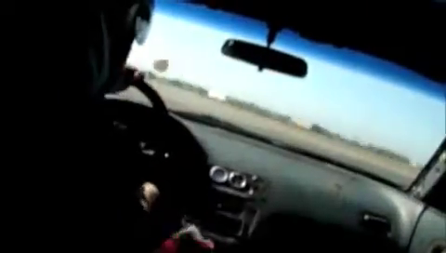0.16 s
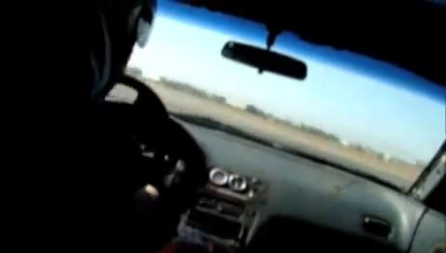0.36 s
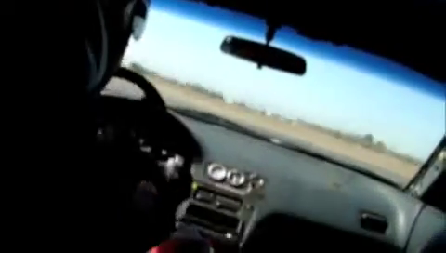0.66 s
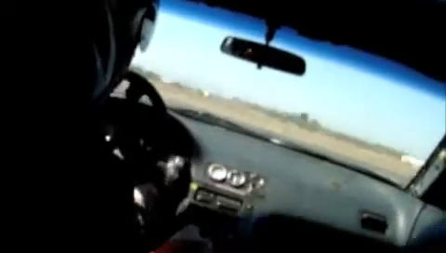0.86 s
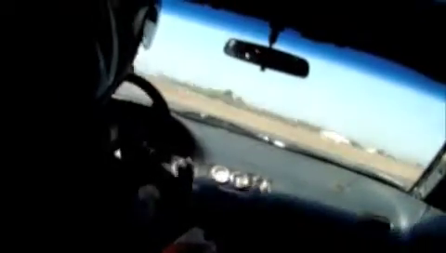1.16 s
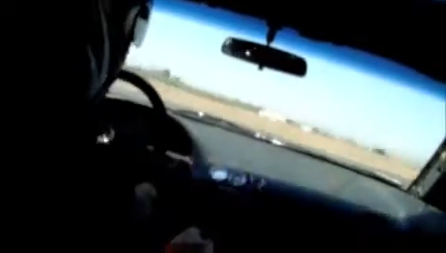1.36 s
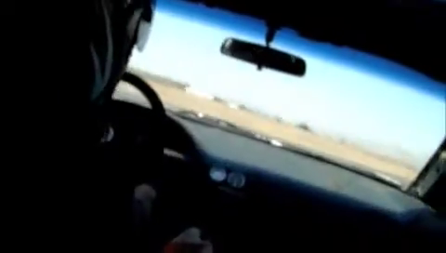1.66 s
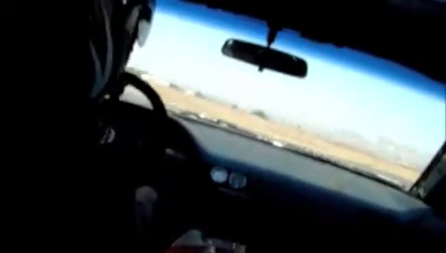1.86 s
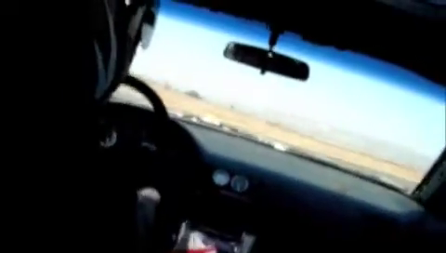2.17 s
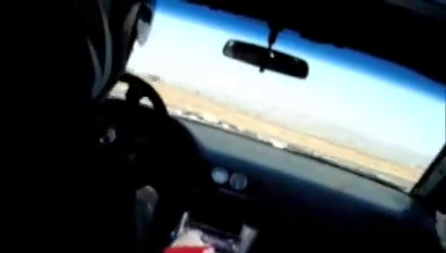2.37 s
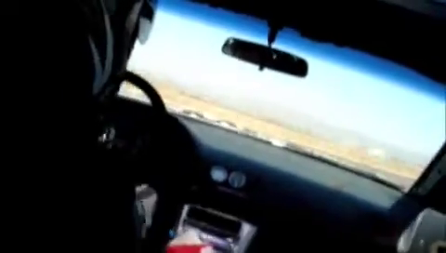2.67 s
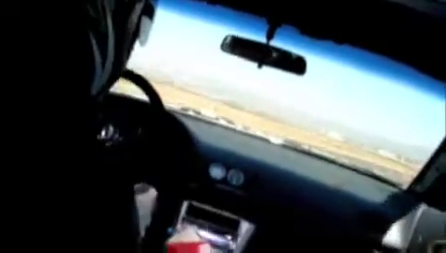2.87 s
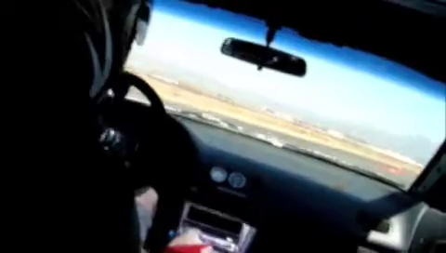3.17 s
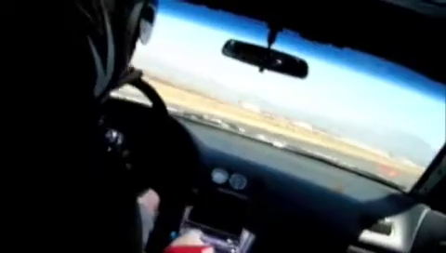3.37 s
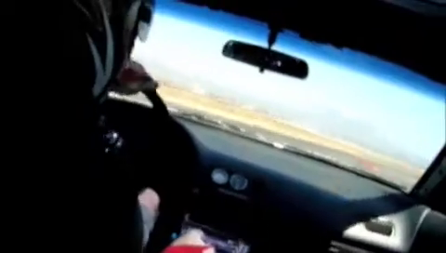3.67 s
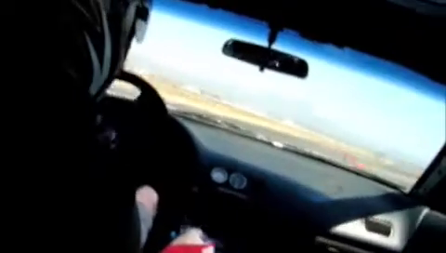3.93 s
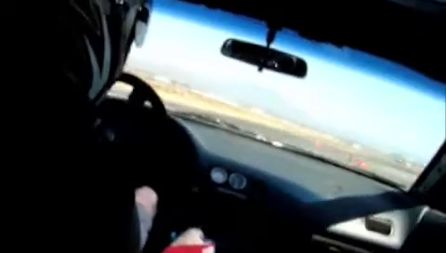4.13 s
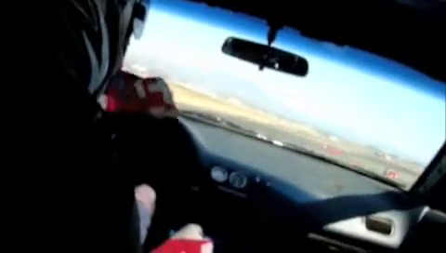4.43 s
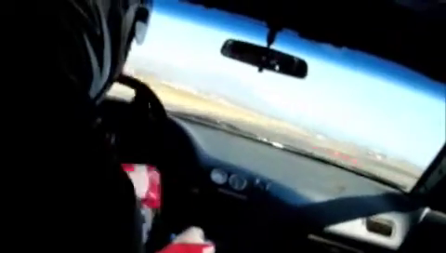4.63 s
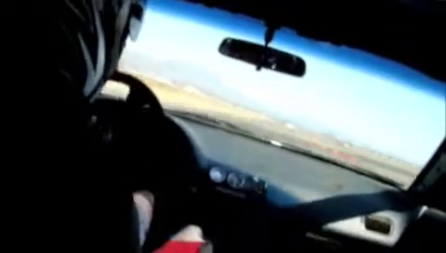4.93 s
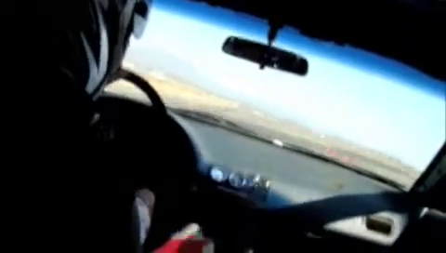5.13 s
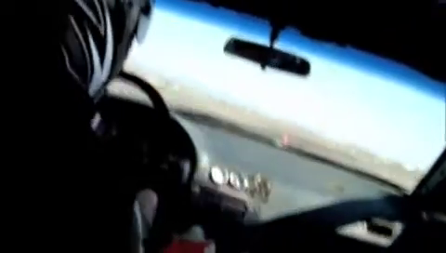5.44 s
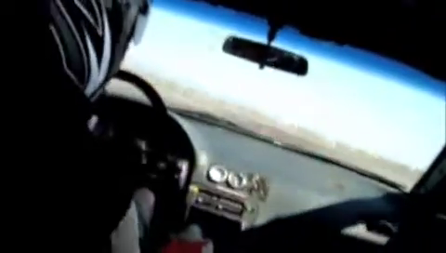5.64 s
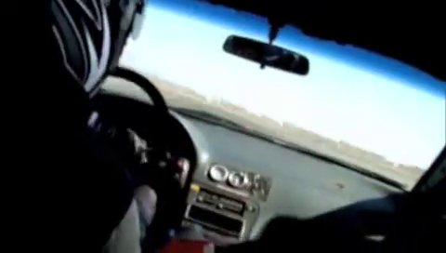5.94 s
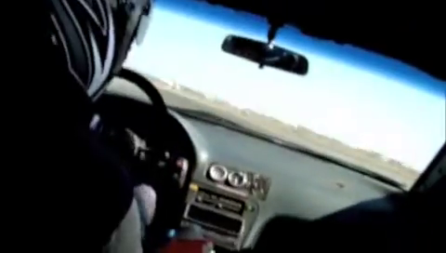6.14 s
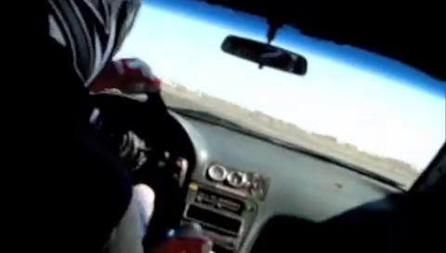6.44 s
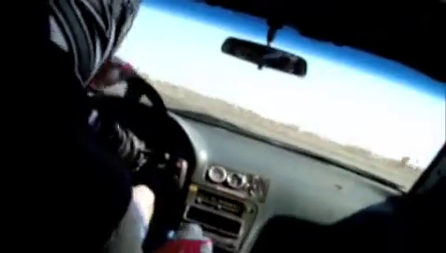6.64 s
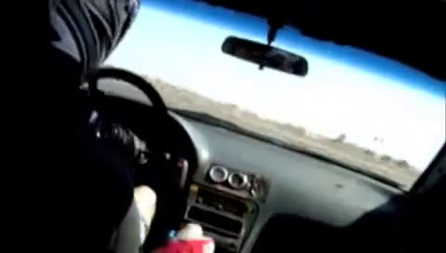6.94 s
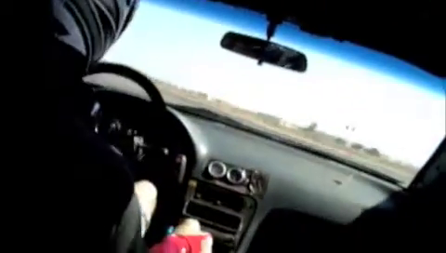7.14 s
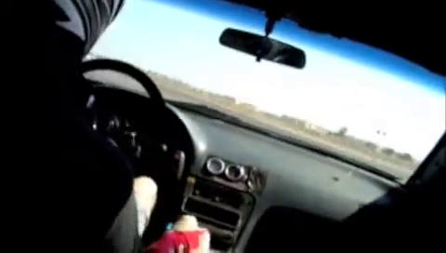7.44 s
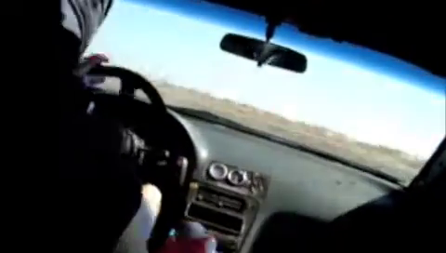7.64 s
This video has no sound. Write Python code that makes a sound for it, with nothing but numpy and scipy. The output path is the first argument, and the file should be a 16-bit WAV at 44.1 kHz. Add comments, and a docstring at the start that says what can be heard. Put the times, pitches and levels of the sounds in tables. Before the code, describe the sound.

Inside a car cabin, a drift is already under way. Two tyres squeal at once, around 1150 and 1330 Hz, rough and wavering, throbbing about ten times a second, with a slow sway between them at first. Gritty rubber scrub hisses around them over low body roar and a buzzing four-cylinder drone. Dull knocks land near 0.9-1 s. Brief harder bites make the squeal clearer and the scrub surge, including a longer one near 3.75 s. Engine pitch creeps upward, with throttle dips. Around 5 s loose parts clatter and a narrow moan swells; roar rises at 5.4 s, with more rattles until 5.9 s. Revs peak near 6.1 s, dip, then another moan and clatter come at 6.5-6.65 s. After revs peak again at 7.1 s, the engine drops sharply and the lower tyre clears into a steadier whistle. Squeal collapses by 7.7 s amid small rattles; a broad roaring surge ends it.

```python
"""Two tyres squeal at once, throbbing with each wheel turn, over engine drone: a long drift heard in the cabin.
Squeal: stick-slip tones with unsteady pitch. Scrub, low roar, rattles, knocks, moans: shaped noise.
Engine: summed harmonics of a four-cylinder four-stroke cycle, geared to the wheel.
Near the end the throttle shuts, the lower tyre clears to a whistle, and a broad surge comes as it returns."""
import sys
import numpy as np
from scipy import signal
from scipy.fft import rfft, irfft
from scipy.io import wavfile

SR = 44100
rng = np.random.default_rng(int(sys.argv[2]) if len(sys.argv) > 2 else 0)


def put_to_file(sound):
    """Save the sound as 16-bit audio at rate SR, in the file named by the first command-line argument."""
    columns = np.atleast_2d(sound).T  # one column per channel
    safe = np.clip(columns, -1, 1)
    whole_steps = np.round(safe * 32767)
    wavfile.write(sys.argv[1], SR, whole_steps.astype(np.int16))


N = 343960
TIME_S = np.arange(N) / SR
BINS_HZ = np.fft.rfftfreq(N, 1 / SR)

# Half lengths and half widths are to 1/e of a Gaussian swell. Source levels are ahead of the cabin.
# Low roar through the body: [f/Hz, relative density/dB]
ROAR_COLOUR = [(20, -28), (45, -29), (75, -16), (110, -7), (230, -6), (300, 2), (450, -1.5), (650, 4.5),
               (850, 4), (1300, 1.5), (2500, -13.5), (8000, -22)]
ROAR_DB = -32.5
# Swells of the low roar, the last a broad surge as the throttle returns: [t/s, half length/s, change/dB]
ROAR_SWELLS = [(.38, 0.28, 2.5), (1.02, 0.15, 2.5), (5.42, 0.33, 6.5), (6.5, .25, 4.5), (7.52, 0.094, 2.5),
               (7.76, .06, 9.5)]
# Knocks through the body: [t/s, peak of noise envelope/dB, centre f/Hz]
KNOCKS = [(.85, -40, 125), (.877, -26.5, 410), (0.977, -28, 407), (5.33, -48, 110), (7.125, -42, 105)]
# Loose bits rattling: [t/s, nominal peak/dB, length/s]
RATTLES = [(4.964, -20, 0.017), (4.995, -17, 0.013), (5.049, -24, 0.037), (5.484, -19, 0.039),
           (5.536, -26, 0.035), (5.843, -21.5, 0.024), (5.86, -22, 0.024), (5.913, -21, 0.026),
           (6.602, -18, 0.03), (6.654, -16.5, 0.017), (7.622, -30.5, 0.022), (7.645, -39, 0.022),
           (7.662, -26.5, 0.029), (7.723, -24.5, 0.029)]
# Rattle spectrum: [f/Hz, relative density/dB]
RATTLE_COLOUR = [(1000, -22), (3000, 0), (4500, 1), (6500, 0.5), (8000, -0.5), (10000, -2.5)]
RATTLE_TAIL_DB, RATTLE_TAIL_S = -14, 0.033  # tail against the main clatter, decay constant
# Engine resonance swells, two narrow moans near 750 Hz, then a broad throttle-return surge:
# [t/s, peak level/dB, centre f/Hz, bandwidth/Hz, half length/s]
ENGINE_SWELLS = [(5.026, -26, 760, 10, 0.22), (6.47, -27, 746, 26, 0.11), (7.79, -26, 637.4, 325, 0.041)]
# Cabin resonances, for all but engine and its swells: [f/Hz, width/Hz, gain of each alone/dB]
CABIN_MODES = [(567, 14, -3), (1024, 26, 7.5), (1076.5, 13.3, 5), (1075, 8.6, 4), (1194, 19, 4),
               (1276, 7.8, 5), (1380, 8.6, 8), (1549, 22, 6.5), (1666, 20, 2.5), (1960, 23, 7.5),
               (2100, 39, 6.5), (2203, 13, 7), (2268, 21, 8), (2390, 34, 6.5), (2518, 40, 3.5),
               (2510, 26, 0.5), (2723, 13, 7), (3250, 37, 3.5), (3330, 30, 1.5), (3980, 14, 7.5),
               (4100, 27, 0.5)]

# Engine speed: [t/s, firing rate/Hz]
FIRING_RATE = [(0, 140), (.35, 147), (.8, 145.1), (1.0, 148.8), (1.42, 154), (2.0, 148.4), (2.25, 152.2),
               (2.55, 150.1), (3.0, 153.8), (3.2, 161.9), (3.4, 158.7), (4.15, 164.9), (4.65, 156.7),
               (4.9, 160.1), (5.15, 160.9), (5.6, 171), (6.08, 177.1), (6.36, 162.2), (6.5, 166.4),
               (7.1, 179.1), (7.3, 139.2), (7.45, 124.4), (7.65, 124.1), (7.8, 139.2)]
# Throttle eased (-) or pressed (+): [t/s, half length/s, change/dB]
THROTTLE = [(0, 0.062, -9), (.75, .1, -5), (1.5, 0.14, -9), (2.95, .15, -1), (4.35, 0.14, -7.5),
            (4.85, 0.38, 6), (5.55, 0.41, 2), (6.23, .11, -12), (6.7, 0.074, -7), (7.23, 0.13, -18)]
# Exhaust booms: [multiple of firing rate, level far from resonance/dB, resonance/Hz, half width/Hz,
# swell/dB, share of throttle change]
BOOMS = [(1, -43, 171, 14.3, 12, 0.96), (2, -50.5, 342, 35, 20, 0.45), (3, -53, 455, 16, 12, .3)]
# Rasp from unequal cylinders: [multiple of four-stroke cycle rate, relative level/dB]
RASP_ORDERS = [(5, -22), (6, -23.5), (7, -14), (9, -14.5), (10, -21), (11, -18), (13, -16), (14, -19),
               (15, -12.5), (16, -4), (17, -11), (18, -12.5), (19, -11), (20, -8), (21, -10.5), (22, -12),
               (23, -23), (24, -7.5)]
# Rasp hardening with revs: [firing rate/Hz, gain/dB]
RASP_BY_RATE = [(126, -57), (140, -41.5), (150, -37.5), (160, -34), (178, -33.5)]
RASP_THROTTLE_SHARE = .15
# Body panels booming as a rasp order crosses them: [f/Hz, width/Hz, gain of each alone/dB]
PANEL_MODES = [(561.5, 4.16, 21), (760, 38, 10.5)]

# Rubber tearing over grit: [t/s, level before swells/dB]
SCRUB_LEVEL = [(0, -21), (.17, -26.5), (.3, -23.5), (.95, -20.5), (1.35, -22.5), (2.2, -20.5), (3.9, -21.5),
               (5.1, -23), (5.45, -24), (5.7, -23), (6.35, -23.5), (7.2, -22.5), (7.67, -35), (7.8, -24.5)]
# Scrub spectrum: [f/Hz, relative density/dB]
SCRUB_COLOUR = [(400, -41), (800, -15.5), (1100, -5.5), (1500, 2), (1780, 5), (2000, -3.5), (2400, -2.5),
                (2850, -2.5), (3100, -4.5), (4000, -7), (5000, -11.5), (6000, -16.5), (8000, -19.5),
                (10000, -24.5)]
# Slow change in scrub colour, roar and fizz grow until 5.5 s, then ease: [t/s, lift against the middle/dB]
SCRUB_BODY = [(0, -1.5), (1, -2), (3, -1.5), (3.8, 0), (5, 1.5), (5.5, 3), (7.1, 1.5), (7.5, 0), (7.8, 0.5)]
FIRINGS_PER_WHEEL_TURN = 15.55
# Grippy tread patches: [place/turns, strength, half length/turns]
PATCHES = [(.025, 3.82, 0.078), (.39, 2.27, .14), (.66, .7, .06)]
# Tyres biting harder, squeal clears and scrub surges: [t/s, half length/s, relative strength]
BITES = [(.6, 0.039, .7), (.8, 0.059, 1), (1.52, 0.038, 1.07), (1.82, 0.051, 0.55), (2.52, 0.063, 0.81),
         (2.85, 0.054, .4), (3.75, 0.212, 0.67), (4.3, 0.039, 0.81), (4.99, 0.061, 0.78),
         (6.61, 0.028, 0.49), (7.26, .07, 0.55)]
BITE_SCRUB_DB = 3  # per unit strength
# Slide: [t/s, higher tyre pitch before bends/Hz, higher tyre level/dB, lower tyre level/dB], levels before rock
SLIDE = [(0, 1350, -21.5, -18), (.15, 1320, -19, -20.5), (1.0, 1320, -18, -23), (1.9, 1310, -19.5, -21.5),
         (2.9, 1320, -18.5, -25.5), (3.9, 1370, -19.5, -30.5), (4.65, 1365, -17.5, -27.5),
         (5.08, 1390, -21, -34), (5.3, 1350, -21.5, -26), (5.5, 1340, -26.5, -34), (5.7, 1330, -23.5, -23),
         (6.35, 1299, -19.5, -24.5), (6.56, 1310, -23.5, -21.5), (6.68, 1375, -20.5, -28),
         (7.1, 1325, -21.5, -21), (7.25, 1334, -20, -18.5), (7.57, 1277, -27, -20), (7.68, 1300, -41, -56),
         (7.8, 1340, -38, -60)]
LOW_PITCH_RATIO = .865  # lower tyre / higher tyre
# Body rocks on entering the drift, passing load from tyre to tyre; bend is a share of pitch
ROCK_HZ, ROCK_PEAK_S, ROCK_SETTLE_S, ROCK_DB, ROCK_BEND = 2.8, 0.0494, 1.2, 3.5, 0.0249
# Pitch roughness (scales the bends): base, then change per unit bite and at full whistle
SLIDE_ROUGH, BITE_ROUGH, WHISTLE_ROUGH = .8, -0.2403, -0.459
# Octave against fundamental: base, then the same changes
SLIDE_OCTAVE_DB, BITE_OCTAVE_DB, WHISTLE_OCTAVE_DB = -11, 4.5, 7
# Lower tyre clears to a whistle as wheelspin dies; its octave lift then fades
WHISTLE_START_S, WHISTLE_RISE_S, WHISTLE_OCTAVE_FADE_S = 7.15, .09, .3
WHISTLE_STEADYING = .5  # share of the wheel's throb removed at full whistle, both tyres
TREAD_CUTOFF_HZ = 960
EDGE_HZ = 10150  # final band limit


def amp(db):
    """Decibels to gain."""
    return 10 ** (np.asarray(db) / 20)


def unit(x):
    """Scale to rms 1."""
    return x / np.sqrt(np.mean(x ** 2) + 1e-20)


def follow(rows):
    """Interpolate each column of a time table at every sample."""
    t_s, *columns = np.transpose(rows)
    return [np.interp(TIME_S, t_s, column) for column in columns]


def swells(rows):
    """Sum of Gaussian swells: time, half length, height."""
    return sum(height * np.exp(-((TIME_S - t_s) / half_s) ** 2) for t_s, half_s, height in rows)


def coloured(points):
    """Noise of rms 1, spectrum interpolated over log frequency."""
    hz, db = np.transpose(points)
    gain = amp(np.interp(np.log(BINS_HZ + 1), np.log(hz), db))
    return unit(irfft(rfft(rng.standard_normal(N)) * gain, N))


def wander(rate_hz):
    """Low-passed random drift of rms 1, mostly below the given rate."""
    return unit(irfft(rfft(rng.standard_normal(N)) / (1 + (BINS_HZ / rate_hz) ** 4), N))


def ring(x, modes):
    """Product of resonances, each raising or lowering a narrow band."""
    response = np.prod([1 + (amp(db) - 1) / (1 + 2j * (BINS_HZ - hz) / width_hz)
                        for hz, width_hz, db in modes], axis=0)
    return irfft(rfft(x) * response, N)


def reflections(x, t60_s, size=4096):
    """Dense early echoes off glass and dashboard, dying fast."""
    t_s = np.arange(size) / SR
    spectrum = rfft(rng.standard_normal(size) * amp(-60 * t_s / t60_s), 2 * size)
    # phase only: smears time, leaves colour nearly even
    echoes = irfft(spectrum / abs(spectrum))[:size]
    return signal.fftconvolve(x, echoes)[:N]


def low_roar():
    """Low roar through the body: coloured noise with a random lumpy level."""
    level_db = ROAR_DB + swells(ROAR_SWELLS) + 2.1 * wander(rate_hz=28)
    return amp(level_db) * coloured(ROAR_COLOUR)


def knocks():
    """Dull, heavily damped blows through the suspension: noise bands under short pulses."""
    out = np.zeros(N)
    for t_s, db, hz in KNOCKS:
        age = np.maximum(TIME_S - t_s, 0) / 0.011  # in rise times
        band = coloured([(hz / 2, -14), (hz, 0), (hz * 2, -14), (hz * 10, -60)])
        out += amp(db) * age * np.exp(1 - age) * band
    return out


def rattles():
    """Dense clatter of loose bits: bright flickering noise in short bursts with faint tails."""
    shake = np.zeros(N)
    for t_s, db, length_s in RATTLES:
        age_s = np.maximum(TIME_S - t_s, 0)
        rise = 1 - np.exp(-age_s / 0.0024)
        fall = np.exp(-(age_s / length_s) ** 3) + amp(RATTLE_TAIL_DB) * np.exp(-age_s / RATTLE_TAIL_S)
        shake += amp(db - 3.5) * rise * fall
    return shake * unit(coloured(RATTLE_COLOUR) * amp(1.2 * wander(rate_hz=1000)))


def engine_swells():
    """Noise bands for engine resonance: two narrow moans, then a broad throttle-return surge."""
    out = np.zeros(N)
    for t_s, db, hz, width_hz, half_s in ENGINE_SWELLS:
        gain = 1 / (1 + (2 * (BINS_HZ - hz) / width_hz) ** 2)
        band = unit(irfft(rfft(rng.standard_normal(N)) * gain, N))
        out += amp(db) * np.exp(-((TIME_S - t_s) / half_s) ** 2) * band
    return out


def engine(firing_hz):
    """Exhaust booms on firing harmonics plus cycle-order rasp; uneven combustion shakes the rasp most."""
    firing_angle = 2 * np.pi * np.cumsum(firing_hz * (1 + 0.0015 * wander(rate_hz=11.0))) / SR
    throttle_db = swells(THROTTLE)
    boom = np.zeros(N)
    for multiple, far_db, hz, half_hz, swell_db, share in BOOMS:
        k = round(multiple)
        nearness = np.exp(-((k * firing_hz - hz) / half_hz) ** 2)
        db = far_db + swell_db * nearness + share * throttle_db
        boom += amp(db + 1.3 * wander(rate_hz=39)) * np.cos(k * firing_angle + k - 1)
    cycle_angle = firing_angle / 4  # four firings per cycle
    rasp = np.zeros(N)
    for order, db in RASP_ORDERS:
        level = amp(db) * (1 + 0.29 * wander(rate_hz=9.2))
        rasp += level * np.cos(round(order) * cycle_angle + 2 * np.pi * rng.random())
    rasp_db = np.interp(firing_hz, *np.transpose(RASP_BY_RATE)) + RASP_THROTTLE_SHARE * throttle_db
    return np.sqrt(2) * (boom + amp(rasp_db) * ring(rasp, PANEL_MODES))


def tread_grip(wheel_angle):
    """Grip rises as each tread patch meets the road; mean removed."""
    turns = wheel_angle / (2 * np.pi)
    grip = np.zeros(N)
    for place, strength, half_turns in PATCHES:
        offset = (turns - place + .5) % 1 - .5
        grip += strength * np.exp(-(offset / half_turns) ** 2)
    return grip - grip.mean()


def scrub(wheel_angle):
    """Gritty hiss of sliding rubber, modulated by wheel turn and bites."""
    hiss, roar_hz, fizz_hz = coloured(SCRUB_COLOUR), 2000, 6000
    middle = 1 / (1 + (BINS_HZ / fizz_hz) ** 8) - 1 / (1 + (BINS_HZ / roar_hz) ** 8)
    roar_and_fizz = irfft(rfft(hiss) * (1 - middle), N)
    hiss = hiss + (amp(follow(SCRUB_BODY)[0]) - 1) * roar_and_fizz
    turn_db = 0.27 * tread_grip(wheel_angle) - 0.27 * np.cos(wheel_angle)
    flicker_db = 0.98 * wander(rate_hz=31) + 0.98 * wander(rate_hz=170)
    level_db = follow(SCRUB_LEVEL)[0] + BITE_SCRUB_DB * swells(BITES) + turn_db + flicker_db
    return amp(level_db) * hiss


def squeal(pitch_hz, whistle, grip, swing, jitter, throb_db, flutter_db, count=2):
    """Tread blocks stick and slip near one pitch; grip bends and swells them."""
    bite = swells(BITES)
    rough = np.maximum(SLIDE_ROUGH + BITE_ROUGH * bite + WHISTLE_ROUGH * whistle, 0)
    whistle_age_s = np.maximum(TIME_S - WHISTLE_START_S - WHISTLE_RISE_S, 0)
    fresh = whistle * np.exp(-whistle_age_s / WHISTLE_OCTAVE_FADE_S)
    octave_db = SLIDE_OCTAVE_DB + BITE_OCTAVE_DB * bite + WHISTLE_OCTAVE_DB * fresh
    out = np.zeros(N)
    for block in range(count):
        bend = swing * grip + .045 * wander(rate_hz=26) + jitter * wander(rate_hz=260)
        angle = 2 * np.pi * (np.cumsum(pitch_hz * (1 + rough * bend)) / SR + rng.random())
        slip = np.sin(angle) + amp(octave_db) * np.sin(2 * angle)
        slip += amp(octave_db - 21.5) * np.sin(3 * angle)
        out += slip * amp(flutter_db * wander(rate_hz=230))
    return unit(out * amp(throb_db * grip))


def tyres(wheel_angle):
    """Two spinning tyres on one axle: the lower throbs hard per turn, the higher a little."""
    pitch_hz, high_db, low_db = follow(SLIDE)
    rock = np.cos(2 * np.pi * ROCK_HZ * (TIME_S - ROCK_PEAK_S)) * np.exp(-TIME_S / ROCK_SETTLE_S)
    pitch_hz = pitch_hz * (1 + ROCK_BEND * rock)
    whistle = np.clip((TIME_S - WHISTLE_START_S) / WHISTLE_RISE_S, 0, 1)
    grip = tread_grip(wheel_angle) * (1 - WHISTLE_STEADYING * whistle)
    high_grip = 0.36 * grip + 0.9 * wander(rate_hz=24.6)
    low_grip = grip + 0.32 * wander(rate_hz=28.0)
    high = squeal(pitch_hz, 0, high_grip, swing=-.012, jitter=.088, throb_db=1.6, flutter_db=2.0)
    low = squeal(pitch_hz * LOW_PITCH_RATIO, whistle, low_grip,
                 swing=-0.01597, jitter=.062, throb_db=2.5, flutter_db=4.5)
    both = amp(high_db + ROCK_DB * rock) * high + amp(low_db - ROCK_DB * rock) * low
    # tread vibrates little below its first resonance
    highpass = signal.butter(6, TREAD_CUTOFF_HZ, "highpass", fs=SR, output="sos")
    return signal.sosfilt(highpass, both)


def scene():
    """Engine and wheel geared together; cabin resonances colour all but engine and its swells."""
    firing_hz, = follow(FIRING_RATE)
    wheel_angle = 2 * np.pi * np.cumsum(firing_hz) / SR / FIRINGS_PER_WHEEL_TURN
    outside = low_roar() + scrub(wheel_angle) + reflections(tyres(wheel_angle), t60_s=0.035)
    cabin = ring(outside + rattles() + knocks(), CABIN_MODES) * amp(-1.05)
    return (cabin + engine(firing_hz) + engine_swells())[None]


def record(dry):
    """Microphone: soft saturation of peaks, then linear-phase low-pass."""
    ceiling = 0.88
    rounded = ceiling * np.tanh(dry / ceiling)
    lowpass = signal.firwin(1023, EDGE_HZ, window=("kaiser", 9), fs=SR)
    return signal.oaconvolve(rounded, lowpass[None], "same")


dry = scene()
out = record(dry)
put_to_file(out)
```